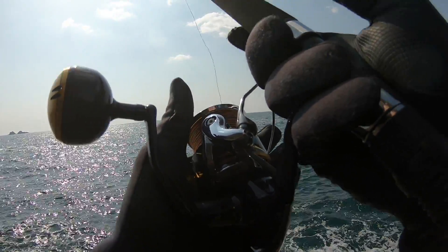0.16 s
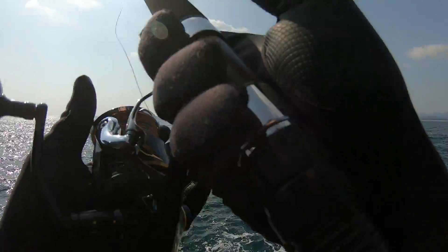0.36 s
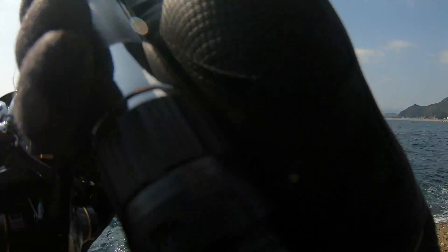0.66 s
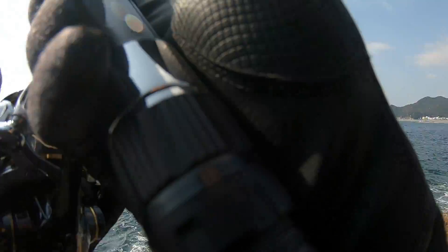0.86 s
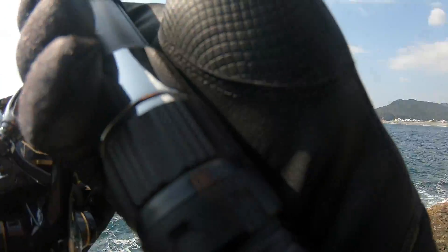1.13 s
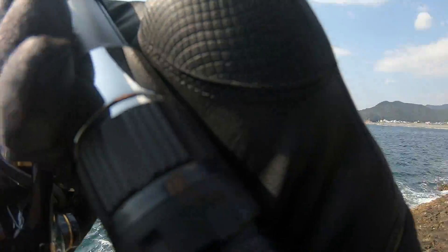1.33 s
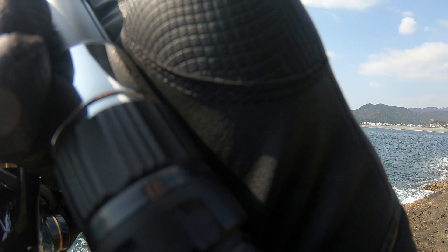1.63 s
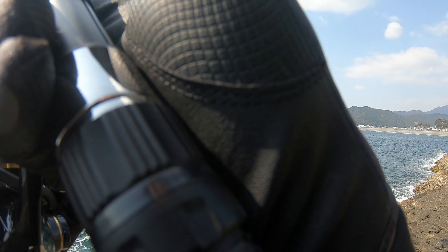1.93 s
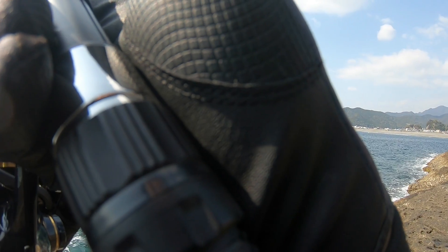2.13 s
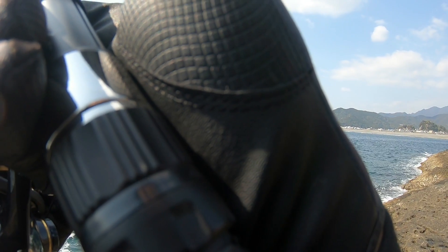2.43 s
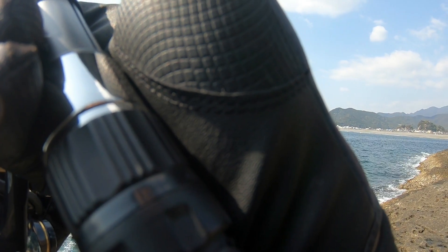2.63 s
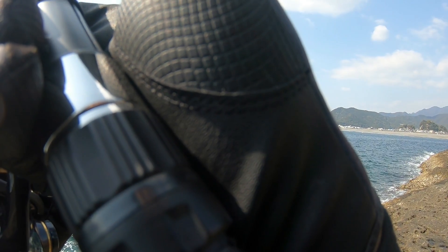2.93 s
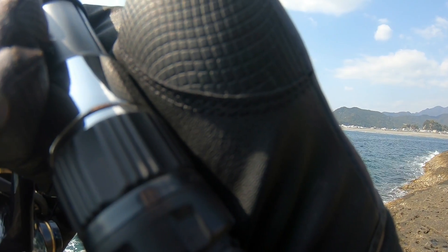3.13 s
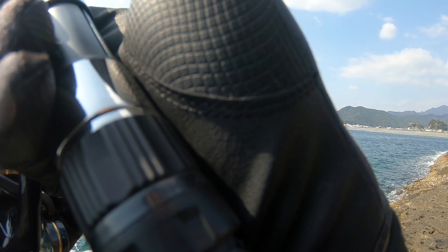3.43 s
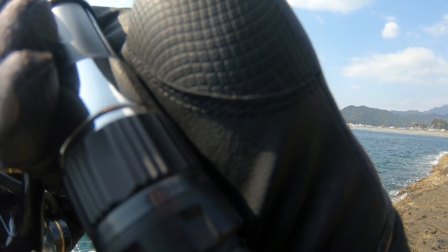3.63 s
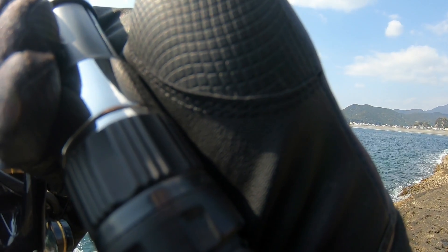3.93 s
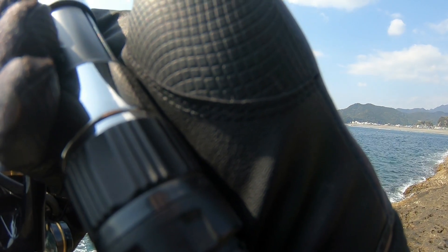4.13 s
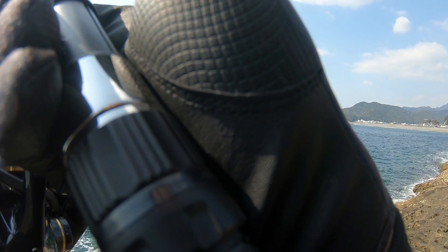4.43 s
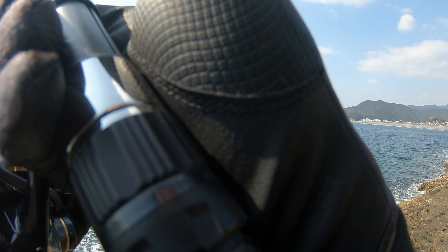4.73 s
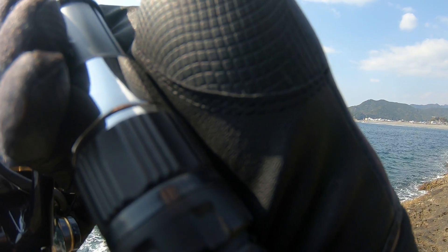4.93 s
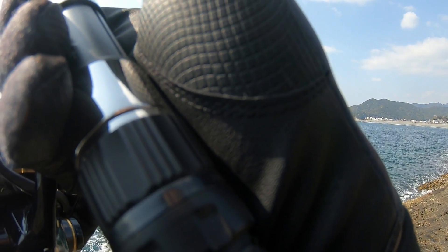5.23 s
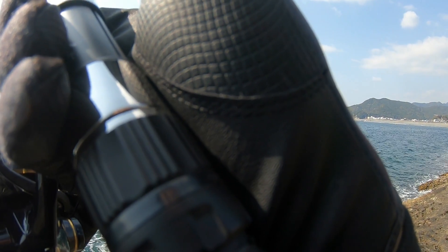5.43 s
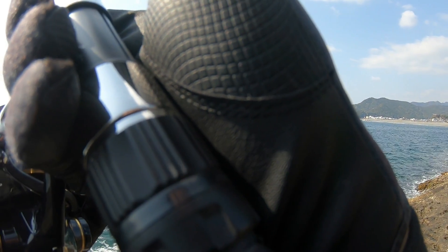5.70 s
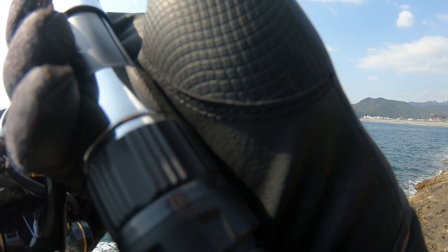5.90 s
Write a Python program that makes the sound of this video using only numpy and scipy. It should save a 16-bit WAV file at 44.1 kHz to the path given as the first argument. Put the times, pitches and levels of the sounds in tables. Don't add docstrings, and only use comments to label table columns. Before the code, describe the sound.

A half-second of hard plastic knocks and a metallic reel snap, then rocky-shore surf washing and easing with lumpy wind on the microphone.

```python
import sys
import numpy as np
from scipy import signal
from scipy.fft import rfft, irfft, next_fast_len
from scipy.io import wavfile
from scipy.ndimage import uniform_filter1d

SR = 44100
rng = np.random.default_rng(int(sys.argv[2]) if len(sys.argv) > 2 else 0)


def field_ratio(decibels):
    return 10 ** (np.asarray(decibels, dtype=float) / 20)


def to_wav(s):
    ch = np.atleast_2d(s).T
    pcm = np.round(np.clip(ch, -1, 1) * 32767)
    wavfile.write(sys.argv[1], SR, pcm.astype(np.int16))


N = 267246


def evened(x):
    return x / np.sqrt(np.mean(x ** 2) + 1e-20)


def read(table_hz, value, at_hz):
    return np.interp(np.log(at_hz + 1), np.log(np.asarray(table_hz) + 1), value)


def add(mix, start_s, sound):
    part = mix[:, round(start_s * SR):][:, :sound.shape[1]]
    part += sound[:, :part.shape[1]]


def frame_axes(size):
    frame_s = np.arange(4 * N // size + 5) * size / 4 / SR
    return frame_s, np.fft.rfftfreq(size, 1 / SR)


def patches(shape, bins, frames):
    field = rng.standard_normal(shape[::-1]).T
    field = uniform_filter1d(field, bins, 0)
    return evened(uniform_filter1d(field, frames, 1))


# (frequency [Hz], left minus right [dB], likeness [0-1], left leads [rad])
PORTS = [(40, -5.1, 0.92, -0.4), (150, -10.4, 0.86, 0.0), (300, -13.5, 0.88, 1.0), (550, -5.1, 0.96, 2.6),
         (800, -3.7, 0.77, -3.1), (1300, 0.2, 0.67, 2.0), (2300, -2.2, 0.36, 0.4), (2550, -0.5, 0.3, 1.4),
         (3300, -3.7, 0.6, 0.4), (4400, -4.9, 0.35, -0.4), (6000, -6.3, 0.33, -2.6),
         (6500, -9.6, 0.19, -0.3), (7300, -0.3, 0.27, -1.3), (8200, -0.2, 0.42, 0.1)]


def through_ports(field_db, colour):
    a, b, c, d = rng.standard_normal(field_db.shape[::-1] + (4,)).T
    size = 2 * len(field_db) - 0.5
    spectra = np.array([a + 1j * b, c + 1j * d]) * field_ratio(field_db)
    pair = signal.istft(spectra, nperseg=size, noverlap=size * 3 // 4)[1]

    length = next_fast_len(N, True)
    hz = np.fft.rfftfreq(length, 1 / SR)
    right, other = rfft(pair, length) * field_ratio(read(*np.transpose(colour), hz))

    port_hz, balance_db, likeness, lead_rad = np.transpose(PORTS)
    same = np.clip(read(port_hz, likeness, hz), 0, 1)
    turn = np.exp(1j * np.interp(hz, port_hz, np.unwrap(lead_rad)))
    left = same * turn * right + np.sqrt(1 - same ** 2) * other
    left = field_ratio(read(port_hz, balance_db, hz)) * left
    return irfft(np.array([left, right]), length)[:, :N]


CALM_DB = -64
# (time [s], level [dB], weight of water [dB])
SWELL = [(0.0, -58, -4.5), (0.25, -60, -1.5), (0.5, -67.5, -3.5), (0.66, -70.5, 5.5), (1.11, -71, 1.5),
         (1.45, -65.5, 1.5), (2.14, -68, 0), (2.31, -66, 0.5), (3.51, -55, 1.5), (3.95, -61.5, 0),
         (4.08, -61.5, -2), (4.23, -66.5, 2.5), (4.79, -66, -2.5), (5.05, -58, -3), (5.18, -61.5, -2.5),
         (5.4, -62.5, -1), (5.75, -68.5, 3.5), (6.06, -69.5, -1)]
LAYER_HZ = [400, 2000, 6500, 13000]
FOLLOW_DB_PER_DB = [0.79, .8, 1.03, 1.4]
WEIGHT_DB_PER_DB = [1.0, .4, 0, 0]
# (frequency [Hz], density [dB/Hz])
SEA = [(20, 7), (100, 4.5), (300, -2), (520, -2), (800, -12), (1300, -23), (1800, -24.5), (2500, -34),
       (3300, -35), (4500, -42.5), (6400, -34.5), (8000, -45.5), (10000, -54.0), (15000, -71.5)]
# (time [s], rise [dB], length [s], centre [Hz])
SLAPS = [(0.1, 2.5, .04, 8000), (0.398, 3, 0.078, 7600), (0.88, 7, 0.026, 1910), (1.26, 8, 0.02, 7200),
         (1.66, 5, 0.019, 3110), (2.302, 5, .007, 2890), (2.467, 5, .007, 3500), (2.525, 9, 0.012, 1710),
         (2.528, 6.5, 0.019, 7000), (2.68, 9, 0.014, 1130), (3.076, 5.5, 0.029, 7300),
         (3.364, 17.5, 0.0017, 6560), (3.6, 9.5, 0.0066, 7200), (4.51, 9.5, 0.011, 6000),
         (4.854, 9.5, 0.033, 1160), (5.064, -3, 0.011, 8100)]
# (time [s], rise [dB], centre [Hz])
THUDS = [(0.852, 13, 396), (1.14, 3.5, 543), (1.24, 6, 397), (1.55, 11, 447), (1.88, 8, 400),
         (2.325, 8, 500), (2.47, -1, 593), (2.515, 10.5, 557), (2.604, 9, 546), (2.633, 8.5, 550),
         (2.68, 2.5, 596), (2.727, 9.5, 560), (2.762, 6, 480), (2.83, 8, 380), (2.92, 9.5, 350),
         (3.169, 7.5, 393), (3.292, 1.5, 350), (3.41, 8, 415), (3.55, 8.5, 453), (3.74, -3, 400),
         (3.818, 8, 400), (4.044, 2.5, 520), (4.15, 4, 396), (4.22, 4.5, 400), (4.52, 6, 410),
         (4.66, 0, 550), (4.891, 10, 435), (5.05, 3, 400), (5.73, -1, 400), (6.0, 3, 500)]
THUD_S = .014


def surf(level_db=-44, patchy_db=1.0, flicker_db=0.52, drops_db=1.47, sheets_db=0.6, bass_hz=130, reach=0.47):
    t, hz = frame_axes(size=256)
    swell_s, surge_db, weight_db = np.transpose(SWELL)
    layers_db = np.outer(FOLLOW_DB_PER_DB, np.interp(t, swell_s, surge_db) - CALM_DB)
    layers_db += np.outer(WEIGHT_DB_PER_DB, np.interp(t, swell_s, weight_db))
    shares = np.array([read(LAYER_HZ, row, hz) for row in np.eye(len(LAYER_HZ))])
    field_db = shares.T @ layers_db

    drift = patches(field_db.shape, bins=4, frames=40)
    spray_share = shares[2:].sum(0)[:, None]
    sheets = evened(uniform_filter1d(drift, size=50, axis=0)) * spray_share
    field_db += patchy_db * drift + sheets_db * sheets
    field_db += flicker_db * patches(field_db.shape, bins=40, frames=14)
    field_db += drops_db * patches(field_db.shape, bins=20, frames=2)

    thuds = [(at_s, rise_db, THUD_S, centre_hz) for at_s, rise_db, centre_hz in THUDS]
    for at_s, rise_db, length_s, centre_hz in SLAPS + thuds:
        spread = np.exp(-(np.log((hz + 1) / centre_hz) / reach) ** 2)[:, None]
        field_db += rise_db * spread * np.exp(-((t - at_s) / length_s) ** 2)
    sea = field_ratio(level_db) * through_ports(field_db, SEA)
    return signal.sosfilt(signal.butter(2, bass_hz, "high", fs=SR, output="sos"), sea)


# (frequency [Hz], right [dB], left [dB], t60 [s], left leads [rad])
HOUSING = [(658, 3, -2.5, 0.022, 3), (803, 3.5, 1.5, 0.035, 3), (1130, -1, -1.7, 0.027, 3.5),
           (1396, -2.5, -5, 0.031, 3.5), (2540, -17.5, -17.5, 0.012, 1.1), (3010, -19.5, -19.5, 0.011, 1.3),
           (3500, -28, -31, 0.0083, 0.9), (4400, -34, -38, 0.011, 1.5)]


def knock(tick_db, thump_db, thump_hz, thump_t60_s, tilt_db_per_octave, chance):
    t = np.arange(SR // 2) / SR
    out = np.zeros((2, len(t)))
    attack = 1 - np.exp(-(t / 0.00085) ** 2)
    for (hz, right_db, left_db, t60_s, lead_rad), (detune, colour) in zip(HOUSING, chance):
        phase = 2 * np.pi * hz * (1 + 0.035 * detune) * t + np.array([[lead_rad], [0]])
        struck_db = tick_db + tilt_db_per_octave * np.log2(hz / 1000) + 2.0 * colour
        swing = field_ratio(struck_db - 60 * t / t60_s) * attack
        out += 0.5 * swing * np.sin(phase) * field_ratio([[left_db], [right_db]])

    late_s = np.maximum(t - .002, 0)
    rise = 1 - np.exp(-(late_s / .004) ** 2)
    thump = field_ratio(thump_db - 60 * late_s / thump_t60_s) * rise * np.sin(2 * np.pi * thump_hz * late_s)
    return out + thump * field_ratio([[-22], [3]])


# (time [s], tick [dB], thump [dB], thump frequency [Hz], thump t60 [s])
KNOCKS = [(0.107, -27.5, -8.5, 203, 0.037), (.132, -2.5, 9, 185, 0.022), (0.1875, -11, -0.5, 188, 0.038),
          (0.2237, -13.5, -2, 205, 0.056), (.232, -5.5, -28, 209, 0.053), (0.2658, -12, -1, 176, 0.039),
          (0.2919, -8.5, -4, 182, 0.042), (.303, -19, -3, 193, 0.037), (0.5161, -2, 5.5, 157, 0.023),
          (0.533, -32, -7, 188, 0.033), (0.835, -43, -11, 204, 0.02), (1.8808, -22, -6, 210, 0.032)]
HARDNESS = [-7, 3, 2, -6, -3.5, -1, 3, -12, 0, -3, -1, -6]


def knocks():
    out = np.zeros((2, N))
    chances = rng.standard_normal((len(KNOCKS), len(HOUSING), 2))
    for (start_s, *blow), tilt, chance in zip(KNOCKS, HARDNESS, chances):
        add(out, start_s, knock(*blow, tilt, chance))
    return out


SNAP_S, SNAP_DB = .5151, -35.5
# (frequency [Hz], level [dB], t60 [s], left share [ratio])
BAIL = [(1160, -9, 0.45, -0.94), (1250, -1.5, 0.45, -0.69), (6200, -18, 0.016, .7), (10500, -26, .015, .7),
        (11900, -34, .015, .7)]


def bail():
    t = np.arange(SR // 2) / SR
    ring = np.zeros((2, len(t)))
    for hz, level_db, t60_s, left in BAIL:
        mode = field_ratio(SNAP_DB + level_db - 60 * t / t60_s) * np.sin(2 * np.pi * hz * t)
        ring += mode * np.array([[left], [1]])
    return ring * (1 - np.exp(-t / 0.00045))


LULL_DB = -44
# (time [s], peak [dB], half length [s])
GUSTS = [(0.137, -23, 0.11), (0.308, -29, 0.13), (0.539, -19.5, 0.027), (0.79, -30.5, 0.057),
         (0.999, -32.5, .05), (1.275, -34.5, 0.16), (1.508, -33.5, 0.06), (1.658, -25.5, 0.041),
         (1.795, -27.5, 0.084), (2.01, -28.5, 0.097), (2.156, -30, 0.12), (2.33, -25, 0.085),
         (2.504, -30, 0.086), (2.68, -25.5, 0.073), (2.864, -23, 0.055), (3.125, -22.5, 0.12),
         (3.255, -38, 0.035), (3.41, -33, 0.054), (3.583, -25, 0.091), (3.689, -18.5, 0.067),
         (3.833, -28.5, 0.11), (4.106, -31, 0.12), (4.337, -25, 0.014), (4.604, -30.5, 0.036),
         (4.734, -31, 0.12), (5.129, -24, 0.064), (5.324, -29, 0.078), (5.588, -27, 0.014),
         (5.788, -26, 0.018), (5.942, -26, 0.24)]
# (frequency [Hz], density [dB/Hz])
BUFFET = [(15, -11), (35, 2.5), (70, -2), (130, -6), (250, -14), (500, -68.5), (1500, -140)]


def wind(lumps_db=3.0, level_db=-12):
    t, hz = frame_axes(size=1024)
    lumps = patches((1, len(t)), bins=1, frames=4)
    at_s, peak_db, half_s = np.transpose(GUSTS)[:, :, None]
    gusts = field_ratio(peak_db) ** 2 * np.exp(-2 * ((t - at_s) / half_s) ** 2)
    power = field_ratio(LULL_DB) ** 2 + gusts.sum(0)
    field_db = np.zeros((len(hz), 1)) + 10 * np.log10(power) + lumps_db * lumps
    return field_ratio(level_db) * through_ports(field_db, BUFFET)


def scene():
    hands = knocks()
    add(hands, SNAP_S, bail())
    return surf() + field_ratio(-6) * hands + wind()


EDGE_CALM_HZ, EDGE_HZ_PER_DB, EDGE_LAG_S, EDGE_RANGE_HZ = 11800, 950, .45, (7000, 15000)
OPEN_S = 0.027


def narrowed(x, size=1024):
    mid, side = (x[0] + x[1]) / 2, (x[0] - x[1]) / 2
    hz, t, z = signal.stft(side, SR, nperseg=size)
    swell_s, surge_db, _ = np.transpose(SWELL)
    low_hz, high_hz = EDGE_RANGE_HZ
    aim_hz = EDGE_CALM_HZ - EDGE_HZ_PER_DB * (np.interp(t, swell_s, surge_db) - CALM_DB)
    keep = np.exp(-t[1] / EDGE_LAG_S)
    edge_hz = low_hz + signal.lfilter([1 - keep], [1, -keep], aim_hz - low_hz)
    edge_hz = np.clip(edge_hz, low_hz, high_hz)
    knocked = (abs(t - np.array(KNOCKS)[:, :1]) < OPEN_S).any(0)
    stereo = hz[:, None] < np.where(knocked, high_hz, edge_hz)
    side = signal.istft(z * stereo, SR, nperseg=size)[1][:N]
    return np.array([mid + side, mid - side])


def low_pass(x):
    return signal.sosfilt(signal.butter(12, 15700, fs=SR, output="sos"), x)


def record(dry, gain_db=13):
    loud = dry * field_ratio(gain_db)
    power_db = 10 * np.log10(abs(uniform_filter1d(loud[1] ** 2, size=200)) + 1e-12)
    fall_db = np.arange(N) * 70.0 / SR
    held_db = np.maximum.accumulate(power_db + fall_db) - fall_db
    over_db = np.maximum(held_db + 7.5, 0)
    ducked = loud / field_ratio(1.1 * uniform_filter1d(over_db, size=200))
    return low_pass(narrowed(ducked))


dry = scene()
out = record(dry)
to_wav(out)
```